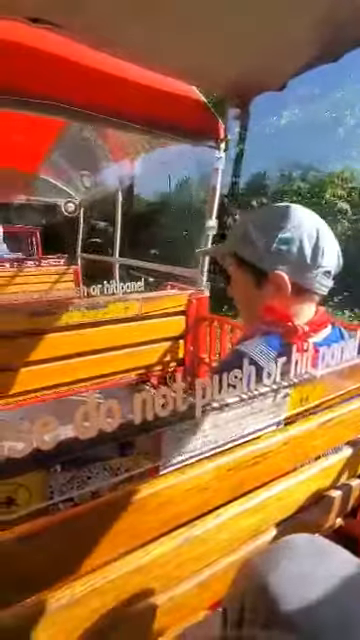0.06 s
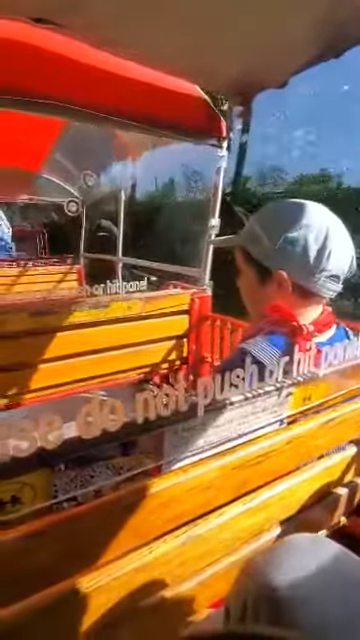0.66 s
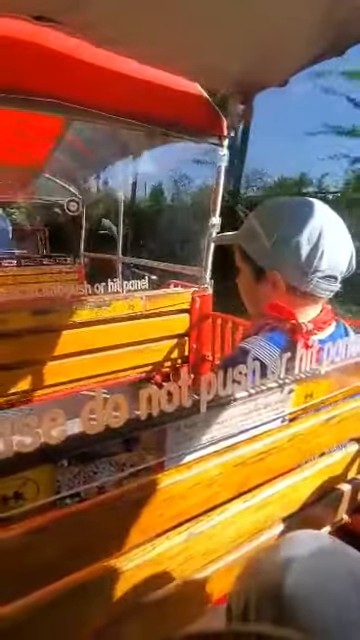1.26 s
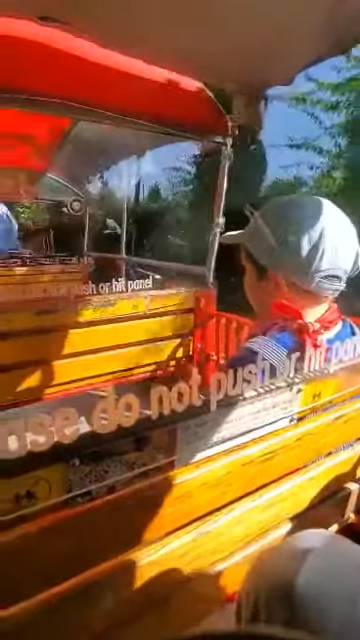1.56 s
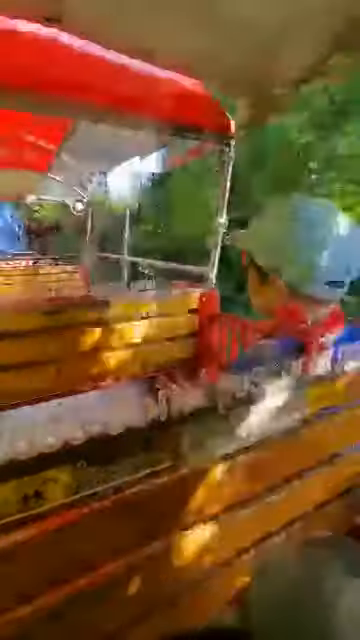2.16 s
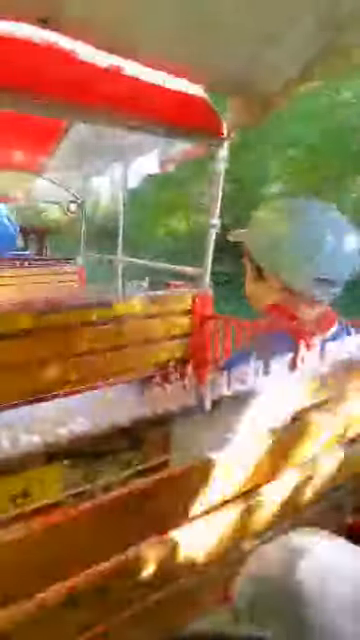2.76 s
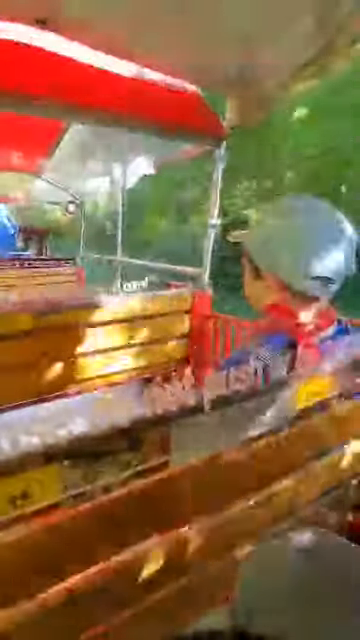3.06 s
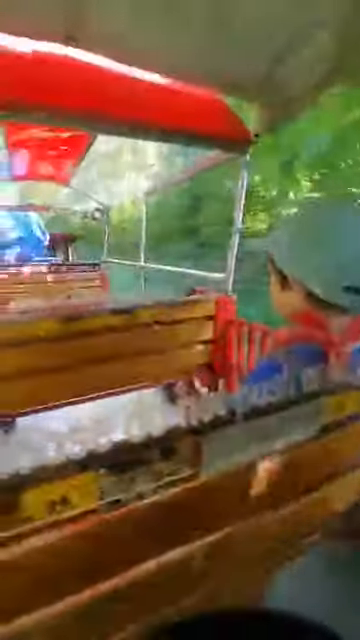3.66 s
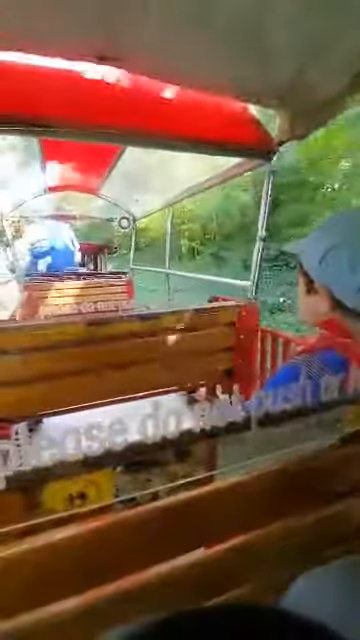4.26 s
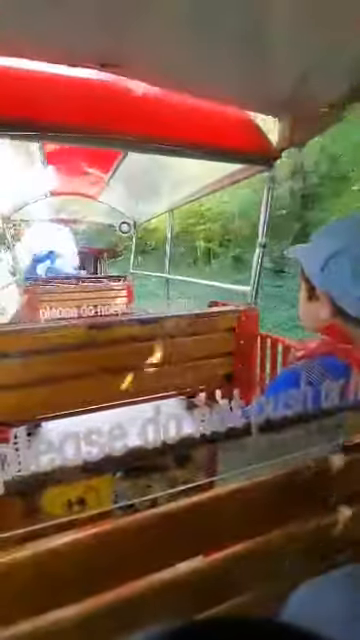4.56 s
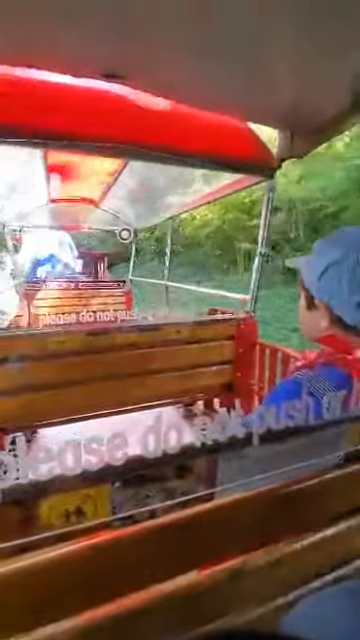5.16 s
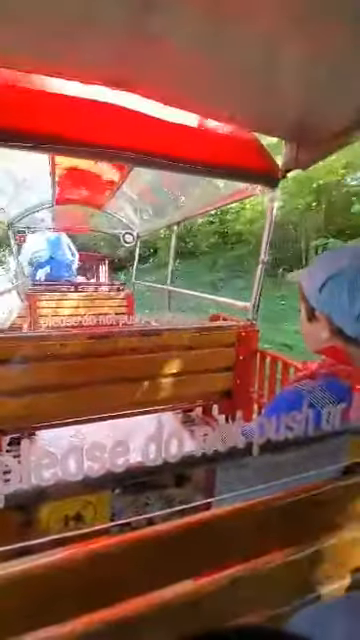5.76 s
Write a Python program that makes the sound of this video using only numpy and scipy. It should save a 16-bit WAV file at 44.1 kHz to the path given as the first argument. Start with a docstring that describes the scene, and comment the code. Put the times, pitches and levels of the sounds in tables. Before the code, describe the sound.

A small train engine drones at a low, steady pitch for the whole six seconds or so, heard outdoors from a bench in an open passenger car. A soft hum and a faint, quickly pulsing hiss go with it. The wheels rumble continuously, making the floor boom and the car body ring lightly. From the start the wheels scrub against the rail in a bend, with a thin, very high singing that peaks around 1 second and fades by about 2 to 3 seconds. Tiny squeaks and groans come between 0.3 and 0.7 seconds, with one more faint squeak near 2.2 seconds. The drone swells slightly around 3.2 seconds. At about 3.7 seconds the track becomes smoother and the floor booms less. The engine and rolling noise continue at the same speed to the end.

```python
"""A small four-cylinder engine pulls an open rail car at steady speed, heard from a bench in the car.
The exhaust drones at twice the firing rate, belt-driven shafts hum, the valve gear hisses once a cycle.
The wheels rumble through the body. In a bend near the start the flanges scrub and sing thinly on the
rail; later the track gets smoother and the floor booms less."""
import sys
import numpy as np
from scipy import signal
from scipy.fft import rfft, irfft
from scipy.io import wavfile
from scipy.ndimage import uniform_filter1d

SR = 44100
rng = np.random.default_rng(int(sys.argv[2]) if len(sys.argv) > 2 else 0)


def unload_audio(sound):
    """Save the sound as a 16-bit wav file, at the path given as the first command line argument."""
    columns = np.transpose(np.atleast_2d(sound))
    # keep every value between -1 and 1, then stretch to whole-number steps
    steps = np.round(np.clip(columns, -1, 1) * 32767)
    wavfile.write(sys.argv[1], SR, steps.astype(np.int16))


N = 255935
TIME_S = np.arange(N) / SR
FREQ_HZ = np.fft.rfftfreq(N, 1 / SR)


def gain_of(db):
    """Decibels to amplitude."""
    return 10 ** (np.asarray(db) / 20)


def curve(rows):
    """(time [s], value) rows interpolated per sample."""
    return np.interp(TIME_S, *np.transpose(rows))


def spectrum(rows):
    """Columns of a frequency table, interpolated on a log axis."""
    hz, *columns = np.transpose(rows)
    return np.array([np.interp(np.log(FREQ_HZ + 1), np.log(hz + 1), c) for c in columns])


def resonances(modes):
    """Left and right gain of steep-sided resonances, summed in power."""
    power = sum(gain_of([[left_db], [right_db]]) ** 2 / (1 + ((FREQ_HZ - hz) / width_hz) ** 2) ** 2
                for hz, width_hz, left_db, right_db in modes)
    return np.sqrt(power)


def wander(cutoff_hz):
    """Low-passed random drift, unit variance."""
    lowpass = 1 / (1 + (FREQ_HZ / cutoff_hz) ** 2) ** 2
    drift = irfft(rfft(rng.standard_normal(N)) * lowpass, N)
    return (drift - drift.mean()) / drift.std()


def noise(density):
    """Stereo noise of given amplitude density: coherent bass, diffuse treble."""
    # left-right likeness: (frequency [Hz], correlation [-])
    likeness = [(160, 1.0), (260, 0.94), (420, 0.23), (680, 0.39), (1100, 0.000059), (1800, -.05),
                (2900, 0.32), (4700, -0.049)]
    correlation = np.clip(spectrum(likeness)[0], -1, 1)
    left, independent = rfft(rng.standard_normal((2, N)))
    right = correlation * left + np.sqrt(1 - correlation ** 2) * independent
    return irfft(np.array([left, right]) * density, N) * np.sqrt(SR / 2)


def patchy(x, depth_db, frames=14, bins=14):
    """Level drift in random time-frequency patches."""
    stft = signal.stft(x, nperseg=512)[2]
    field = uniform_filter1d(rng.standard_normal(stft.shape[1:]), bins, 0)
    field = uniform_filter1d(field, frames, 1)
    return signal.istft(stft * gain_of(depth_db * field / field.std()))[1][:, :N]


def canopy(x, echo_db=-6, count=12):
    """Early echoes off benches, screens and roof, different on each side."""
    taps = np.zeros((2, SR // 30))
    for side in taps:
        echoes = rng.choice([-1, 1], count) * gain_of(echo_db) / np.sqrt(count)
        side[rng.integers(SR // 500, len(side), count)] = echoes
    taps[:, 0] = 1
    return signal.oaconvolve(x, taps / np.linalg.norm(taps[0]), axes=1)[:, :N]


def exhaust(turns, swell_hz=1.3, swell_db=0.62, crest_s=1.187, flutter_db=1.0, flutter_hz=4):
    """Four firings in two turns; unequal cylinders make the crank hurry and lag once a cycle."""
    # drone strength: (time [s], level [dB])
    strength = [(0, -12.6), (2.3, -11.4), (3.25, -9.9), (3.55, -12.5), (4.0, -11), (5.8, -11.1)]
    # exhaust partials: (order [x crank speed], relative level [dB])
    partials = [(2, -18), (2.5, -32), (3, -39), (4, 0), (5, -28), (6, -27), (6.5, -34), (7, -26),
                (7.5, -22), (8, -32), (10, -35), (11.5, -34), (12.5, -38), (14.5, -40), (18, -34),
                (21.5, -41), (33, -42)]
    level_db = curve(strength) + swell_db * np.cos(2 * np.pi * swell_hz * (TIME_S - crest_s))
    imbalance = np.cos(np.pi * turns)
    crank_turns = turns + 0.008 * imbalance
    drone = np.zeros(N)
    for order, db in partials:
        drift_db = flutter_db * wander(flutter_hz) if order > 4 else 0
        drone += gain_of(db + drift_db) * np.cos(2 * np.pi * (order * crank_turns + rng.random()))
    return np.sqrt(2) * gain_of(level_db) * (1 + 0.07 * imbalance) * drone


def shafts(turns, slip_turns=0.02, flutter_db=2.5):
    """Fan and pump hum out of step with the firing; their belt slips a little."""
    # shaft tones: (speed [x crank speed], [(harmonic [-], level [dB])])
    tones = [(1.66, [(2, -35), (3, -34), (4, -31), (6, -31.5)]), (1.104, [(1, -55), (2, -44), (4, -36)])]
    hum = np.zeros(N)
    for ratio, harmonics in tones:
        angle_rad = 2 * np.pi * (ratio * turns + slip_turns * wander(3.7))
        for harmonic, db in harmonics:
            gain = gain_of(db + flutter_db * wander(7.9))
            hum += gain * np.cos(harmonic * angle_rad + 2 * np.pi * rng.random())
    return np.sqrt(2) * hum


def valves(turns, throb_db=1.7):
    """Valve-gear hiss, swelling once per two-turn cycle."""
    # hiss spectrum: (frequency [Hz], left [dB/Hz], right [dB/Hz])
    hiss_bands = [(1490, -85, -92), (3250, -80.5, -89), (4460, -79.5, -87), (5500, -79, -84.5),
                  (6600, -79.5, -85.5), (7530, -86, -91), (8600, -90, -90), (12500, -96, -96)]
    hiss = patchy(noise(gain_of(spectrum(hiss_bands))), depth_db=3.08, frames=9, bins=7)
    return hiss * gain_of(throb_db * np.cos(np.pi * turns))


def rolling(wheel_hz=7.3, wheel_db=0.6, rough_db=1.5, smooth_db=-3, change_at_s=3.7, change_s=0.26):
    """Rails, rough then smoother, shake the floor and ring the body; the roar swells each wheel turn."""
    # wheel-rail roar: (frequency [Hz], left [dB/Hz], right [dB/Hz])
    roar_bands = [(229, -67, -68), (320, -58, -61), (460, -59.5, -62), (606, -68.5, -70.5),
                  (950, -65.5, -68), (1350, -70, -73.5), (1940, -67, -73.5), (2650, -77, -76),
                  (3190, -78.5, -80.5), (4060, -83, -94), (6500, -84, -88), (8500, -95.5, -95),
                  (12500, -94, -95)]
    # body and wheel modes: (frequency [Hz], width [Hz], left [dB/Hz], right [dB/Hz])
    body_modes = [(258.3, 11.2, -45, -46.5), (387, 27, -54, -60), (489, 26.5, -55, -57.5),
                  (527.3, 10.5, -65.5, -51.5), (642, 40, -77, -63), (771, 40, -58.5, -62.5),
                  (876, 27, -65, -66), (947, 12.5, -61.5, -68), (1154, 57, -67, -71), (1277, 26, -71, -74),
                  (1480, 70, -66.5, -67.5), (1605, 45, -64, -73), (1740, 16, -66.5, -67.5),
                  (2110, 60, -70, -72.5), (2246, 45, -68.5, -65.5), (2494, 40, -67, -74),
                  (2638, 21, -66.5, -74.5), (2710, 38, -72, -73.5), (3447, 24, -78.5, -73.5),
                  (3710, 38, -74, -86), (4530, 250, -77, -79.5), (5480, 110, -80.5, -80)]
    # floor panel modes: (frequency [Hz], width [Hz], left [dB/Hz], right [dB/Hz])
    floor_modes = [(188.2, 16.6, -39.5, -39), (293, 25, -56.5, -59)]
    # car rumble: (frequency [Hz], level [dB/Hz])
    rumble_bands = [(24, -78), (40, -69), (62, -55.5), (90, -50.5), (150, -49.5), (210, -58), (235, -67.5),
                    (290, -52), (420, -63.5), (600, -75), (1000, -84.5), (3000, -110)]
    smoothness = (1 + np.tanh((TIME_S - change_at_s) / change_s)) / 2
    track_db = rough_db + (smooth_db - rough_db) * smoothness
    wheel_turns = wheel_hz * TIME_S + 0.12 * wander(0.9)
    contact = gain_of(wheel_db * np.cos(2 * np.pi * wheel_turns))
    roar = noise(gain_of(spectrum(roar_bands)))
    roar = patchy(canopy(roar), depth_db=1.34)
    body = noise(resonances(body_modes)) * gain_of(0.1 * track_db)
    boom = noise(resonances(floor_modes)) * gain_of(track_db)
    rumble = noise(gain_of(spectrum(rumble_bands)))
    return rumble + boom + contact * (roar + body)


def bend(straight_db, peak_db, lead_s=0, stretch=1, apex_s=0.99, bite_s=0.46, release_s=0.64):
    """Gain from flange pressure in one bend: quick bite, slower release."""
    t = (TIME_S - apex_s + lead_s) / stretch
    pressure = np.where(t < 0, np.exp(-(t / bite_s) ** 2), np.exp(-abs(t) / release_s))
    return gain_of(straight_db) + (gain_of(peak_db) - gain_of(straight_db)) * pressure


def flanges():
    """Flanges rub the rail: broad scrub, thin singing wheel modes, a few short squeaks."""
    # scrub spectrum: (frequency [Hz], left [dB/Hz], right [dB/Hz])
    scrub_bands = [(500, -70.5, -80), (1000, -64.5, -68.5), (1500, -76, -67.5), (2160, -70.5, -63),
                   (2630, -77.5, -75.5), (4000, -78, -81.5), (5400, -82.5, -85), (7500, -85.5, -100),
                   (10000, -94, -93), (12500, -103, -98)]
    # high wheel modes: (frequency [Hz], width [Hz], left [dB/Hz], right [dB/Hz])
    wheel_modes = [(10000, 250, -83, -79), (10920, 180, -79, -84), (12420, 220, -78.5, -77)]
    # groans and squeaks: (time [s], half-length [s], frequency [Hz], width [Hz], level [dB/Hz])
    bursts = [(.26, 0.017, 6000, 250, -68), (0.363, 0.042, 1500, 90, -56), (0.663, 0.024, 1500, 50, -51.5),
              (2.237, .018, 6050, 300, -67)]
    scrub = patchy(noise(gain_of(spectrum(scrub_bands))), depth_db=2.0, frames=8, bins=10)
    scrub *= bend(straight_db=-9.5, peak_db=1, lead_s=0.17, stretch=1.93)
    singing = patchy(noise(resonances(wheel_modes)), depth_db=3, frames=6, bins=6)
    singing *= bend(straight_db=-30, peak_db=-1.5)
    squeaks = np.zeros((2, N))
    for at_s, half_s, hz, width_hz, db in bursts:
        envelope = np.exp(-((TIME_S - at_s) / half_s) ** 2)
        squeaks += envelope * noise(resonances([(hz, width_hz, db, db)]))
    return canopy(scrub + singing, echo_db=-3.5) + squeaks


def scene():
    """Engine ahead, wheels below."""
    # crank speed: (time [s], speed [rev/s])
    crank_speed = [(0, 27.12), (2.5, 27.25), (4.0, 27.18), (4.6, 27.11), (5.8, 27.12)]
    turns = np.cumsum(curve(crank_speed)) / SR
    engine = exhaust(turns) + shafts(turns) + canopy(valves(turns), echo_db=-5)
    return engine + rolling() + flanges()


def record(dry, cutoff_hz=12850):
    """Steep low-pass band limit."""
    lowpass = signal.firwin(511, cutoff_hz, window=("kaiser", 9), fs=SR)
    return signal.oaconvolve(dry, lowpass[None], "same")


dry = scene()
out = record(dry)
unload_audio(out)
```